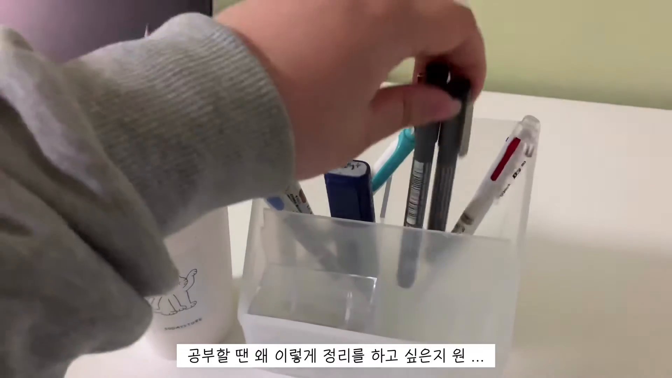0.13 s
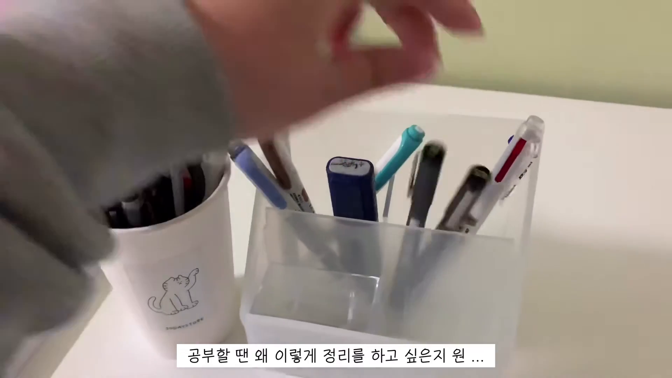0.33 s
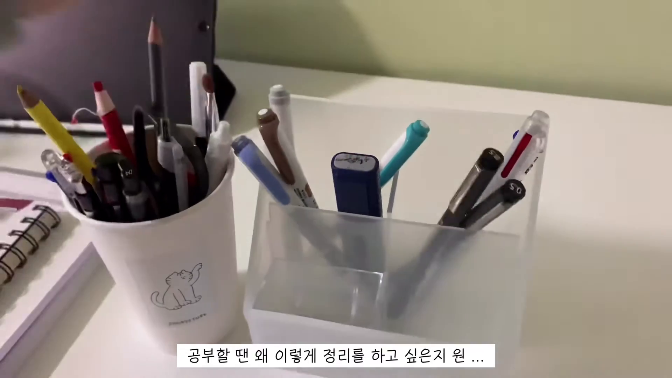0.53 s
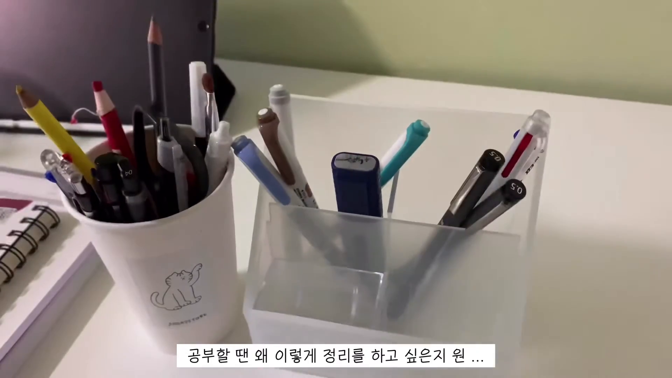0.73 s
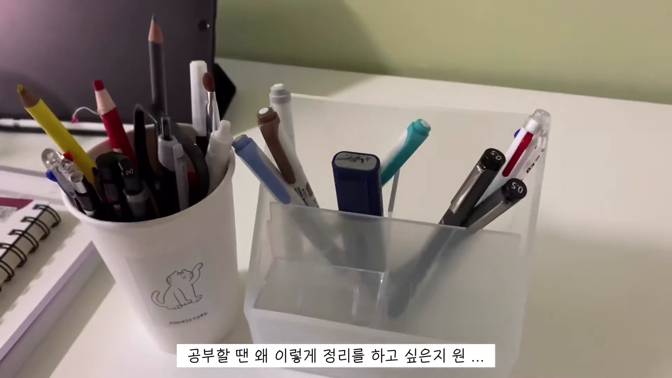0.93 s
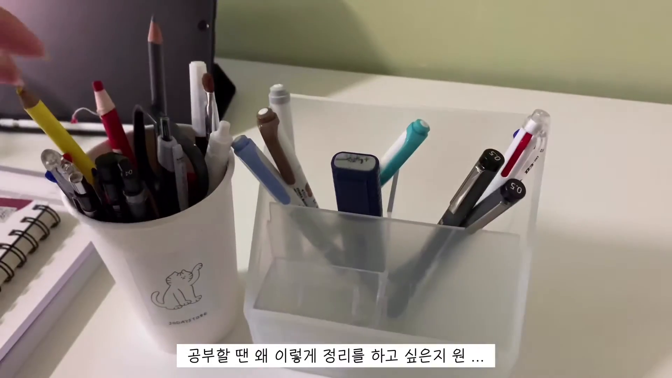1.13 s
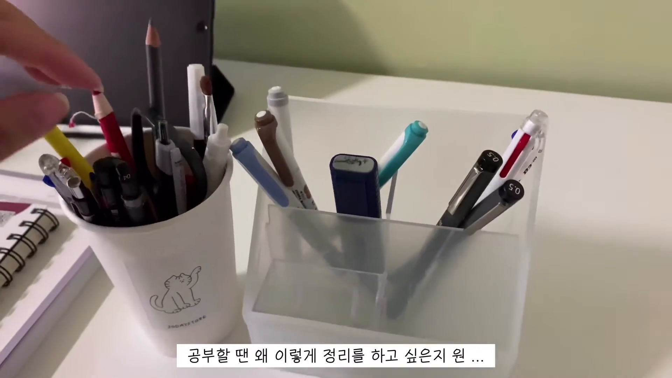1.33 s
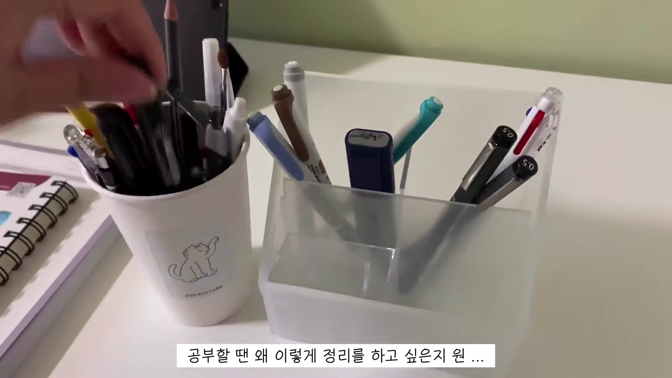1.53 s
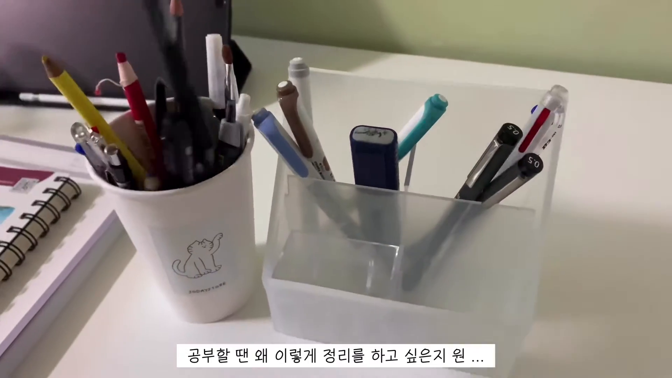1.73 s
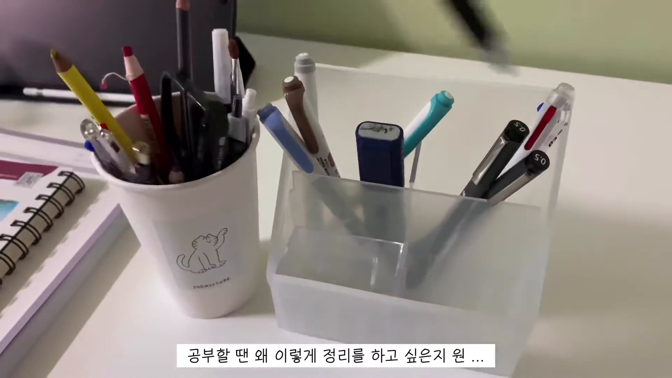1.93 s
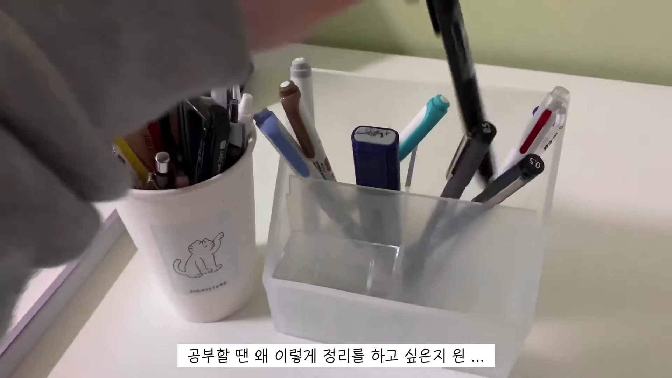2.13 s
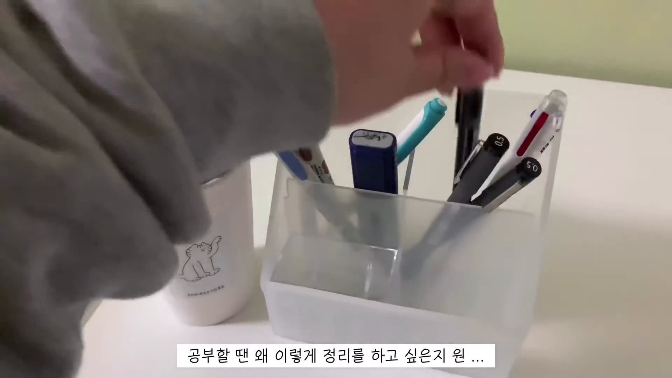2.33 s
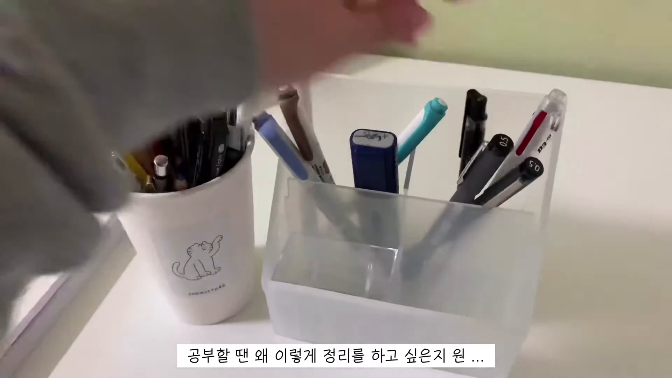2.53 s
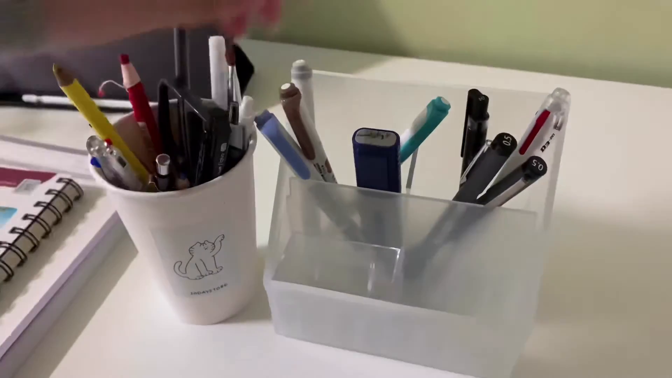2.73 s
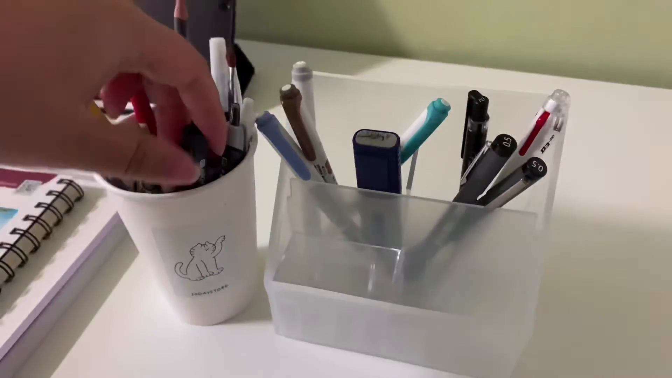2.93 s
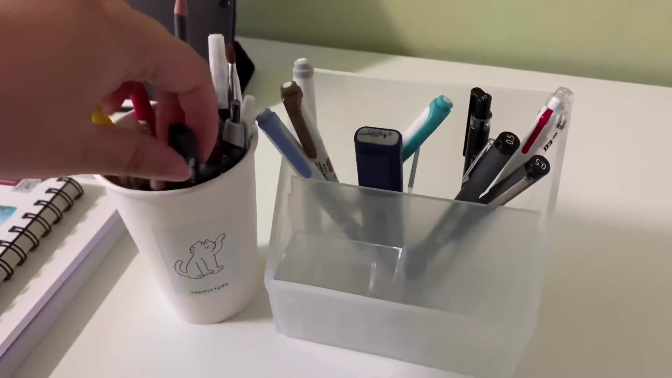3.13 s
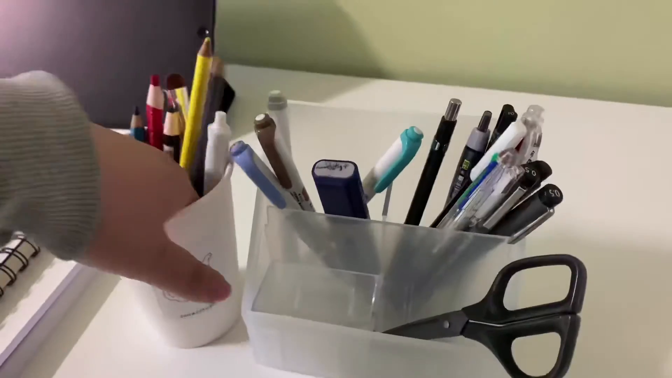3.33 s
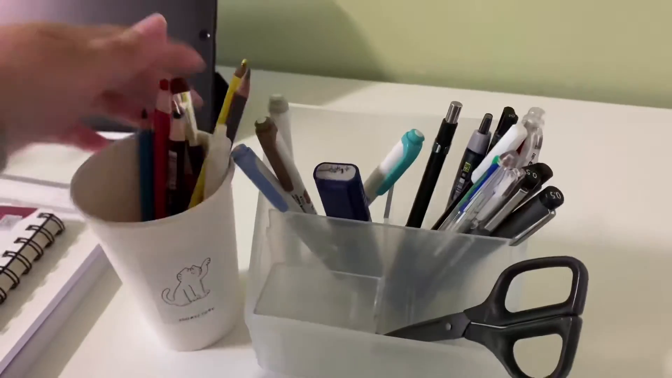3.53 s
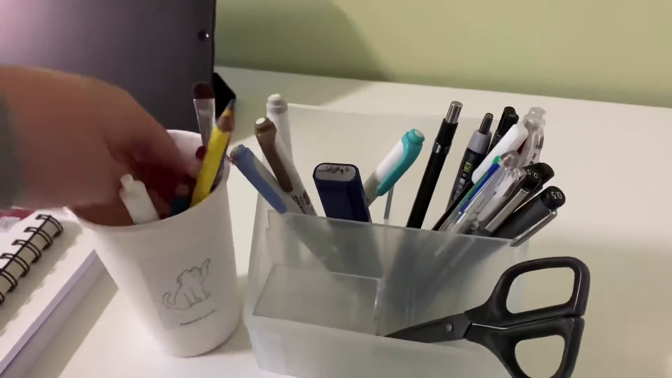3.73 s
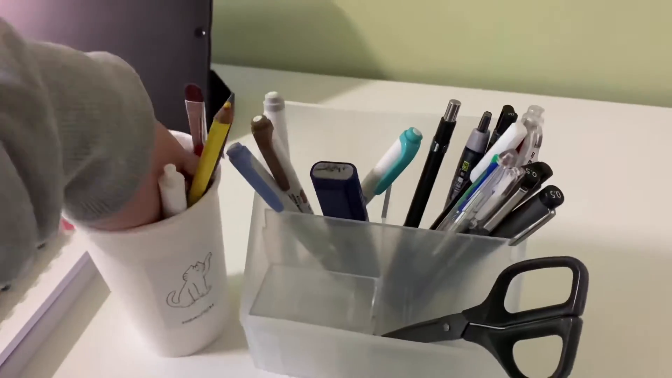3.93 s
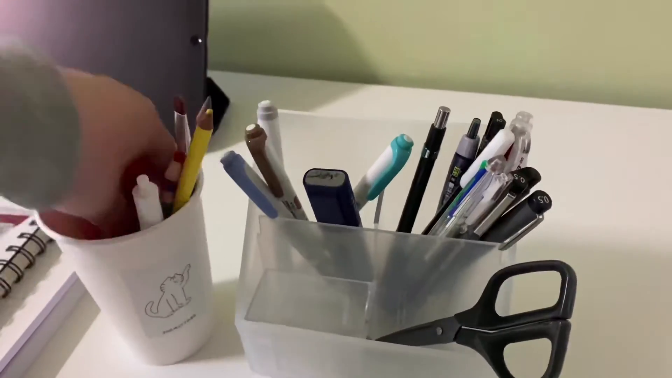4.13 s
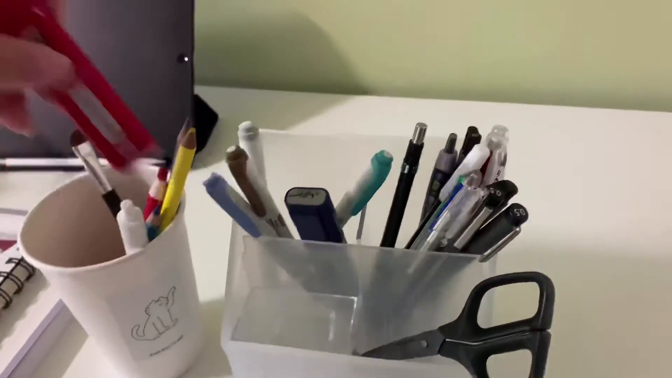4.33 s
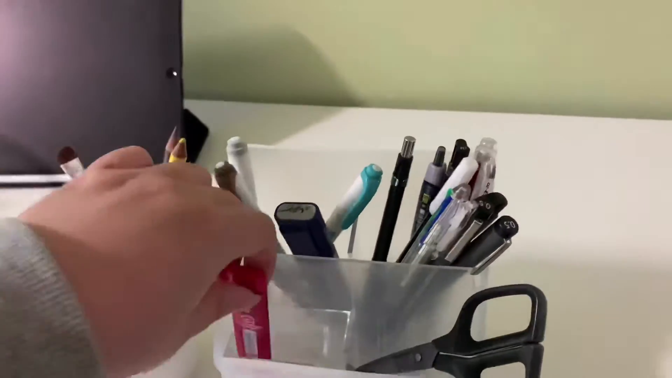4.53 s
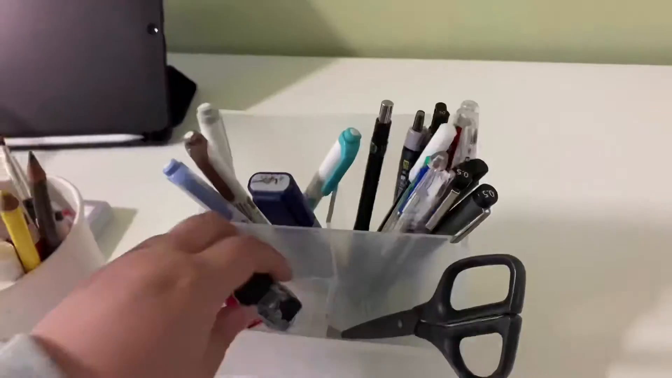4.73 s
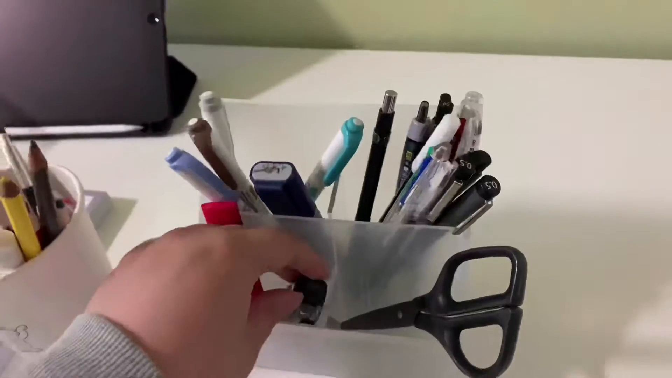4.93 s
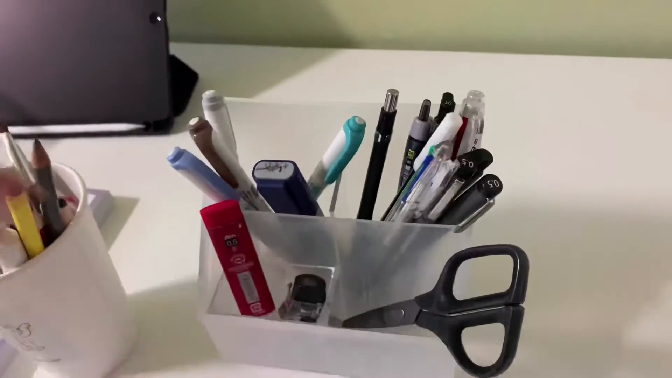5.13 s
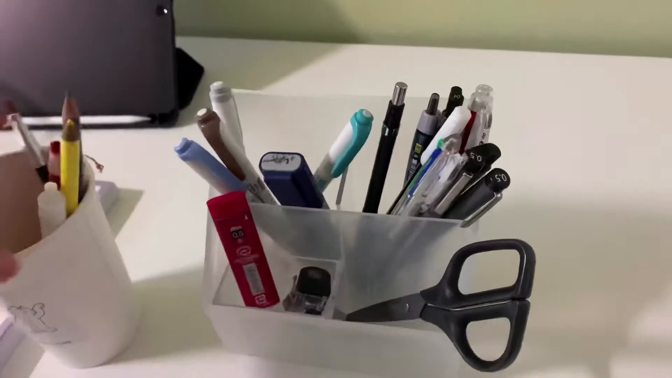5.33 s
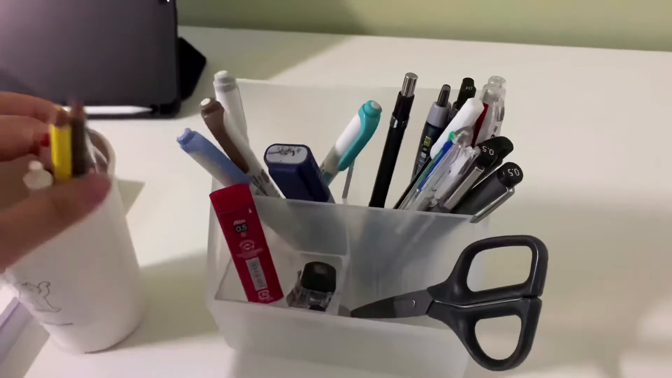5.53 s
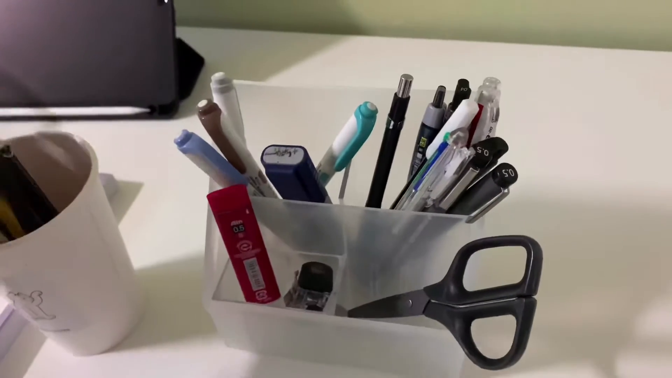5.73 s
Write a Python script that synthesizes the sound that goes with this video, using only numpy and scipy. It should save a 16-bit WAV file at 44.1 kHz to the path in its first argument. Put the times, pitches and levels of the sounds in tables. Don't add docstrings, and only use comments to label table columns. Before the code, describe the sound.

Close stationery sounds: hard pen drops in a plastic organizer, rustling in a paper cup, then higher, faster rattling and small clicks, ending with a sharp knock.

```python
import sys
import numpy as np
from scipy import signal
from scipy.fft import rfft, irfft, next_fast_len
from scipy.io import wavfile
from scipy.ndimage import uniform_filter1d

SR = 44100
rng = np.random.default_rng(int(sys.argv[2]) if len(sys.argv) > 2 else 0)


def generate_wav(sig):
    pcm = np.round(np.clip(np.atleast_2d(sig).T, -1, 1) * 32767).astype(np.int16)
    wavfile.write(sys.argv[1], SR, pcm)


def elevation(decibels):
    levels = np.asarray(decibels, float)
    return 10 ** (levels / 20)


N = 259308
SPEED = 2.725
FAST_FROM_S = 3.21
# frequency in Hz, level in dB, t60 in s.
DESK = [(58.5, -10, 0.14), (113, -5, 0.025), (111, -2, 0.14), (144.7, 1, 0.088), (268, -9, 0.089)]


def evened(x):
    return x / np.sqrt(np.mean(x ** 2) + 1e-20)


def read(points, hz):
    f, value = np.transpose(points)
    return np.interp(np.log(hz + 1), np.log(f + 1), value)


def coloured(x, points):
    hz = abs(np.fft.fftfreq(4096, 1 / SR))
    log_gain = np.maximum(read(points, hz), -100) * np.log(10) / 20
    taps = np.fft.ifft(np.exp(np.conj(signal.hilbert(log_gain)))).real[:2048]
    taps = taps.reshape((1,) * (x.ndim - 1) + (-1,))
    return signal.oaconvolve(x, taps, axes=-1)[..., :x.shape[-1]]


def band(x, lo_hz, hi_hz):
    return signal.sosfilt(signal.butter(2, [lo_hz, hi_hz], "band", fs=SR, output="sos"), x)


def ring(modes, t, chance, detune, uneven_db):
    hz, db, t60_s = np.transpose(modes)[:, :, None]
    level_chance = chance[:len(hz), None]
    pitch_chance = chance[::-1][:len(hz), None]
    decay = elevation(db + uneven_db * level_chance - 60 * t / t60_s)
    swell = 1 - np.exp(-t * hz / 0.68)
    x = (decay * swell * np.sin(2 * np.pi * hz * (1 + detune * pitch_chance) * t)).sum(0)
    return x / abs(x).max()


def air(colour, db, same):
    a, b = rng.standard_normal((2, N))
    return elevation(db) * evened(coloured(np.array([a + same * b, a - same * b]), colour))


def room(x, speed):
    # frequency in Hz, t60 in s.
    decay_times = [(100, 0.35), (500, 0.19), (2000, 0.13), (8000, 0.097), (13000, 0.084)]
    taps = np.zeros((2, SR // 2))
    at = np.arange(400, SR // 2 - 10, 10)
    at = at + rng.integers(0, 10, (2, len(at)))
    np.put_along_axis(taps, at, rng.choice([-1., 1.], at.shape), 1)
    hz, t, z = signal.stft(taps, SR, nperseg=256)
    decay = elevation(-60 * t * speed / read(decay_times, hz / speed)[:, None])
    tail = signal.istft(z * decay, SR, nperseg=256)[1]
    flutter = evened(uniform_filter1d(rng.standard_normal(N), int(150 / speed)))
    x = x + 1.4 * flutter * band(x, 250 * speed, 19845)
    return signal.fftconvolve(x.mean(0)[None], tail / np.linalg.norm(tail[0]), axes=1)[:, :N]


def bumps(rows, desk_speed, rise_s, db, sag_db):
    out, t = np.zeros(N + SR), np.arange(int(.25 * SR)) / SR
    modes = DESK + [(54.3, sag_db, 0.1)]
    for (s, peak_db), chance in zip(rows, rng.standard_normal((len(rows), 8))):
        push = ring(modes, t * desk_speed, chance, 0.014, 3.6) * (1 - np.exp(-t / rise_s))
        out[round(s * SR):][:len(t)] += elevation(db + peak_db) * push / abs(push).max()
    return out[:N]


def rattle(shift, per_s, spread_db):
    # frequency in Hz, level in dB, t60 in s.
    loose_pens = [(560, 3, 0.013), (920, -0.5, 0.027), (1550, -17, 0.055), (2220, -6, 0.068),
                  (3900, -4.5, 0.0047), (4800, -17.5, 0.02)]
    pens = loose_pens * 2
    size = elevation(spread_db * np.minimum(rng.exponential(1, N), 4)) * (rng.random(N) < per_s / SR)
    which, out = rng.integers(0, len(pens), N), np.zeros(N)
    for k, (hz, db, t60_s) in enumerate(pens):
        r = elevation(-60 * shift / (t60_s * SR))
        turn = 2 * np.pi * hz * shift * rng.uniform(1.0, 1.08) / SR
        resonator = [1, -2 * r * np.cos(turn), r * r]
        out += elevation(db) * signal.lfilter([np.sin(turn)], resonator, size * (which == k))
    return evened(out)


def hands(strokes, colour, speed, desk_speed, rumble_db, split_hz, per_s, spread_db, smooth, pens):
    grip_s = 0.01
    t, level = np.arange(N) / SR, np.zeros((3, N))
    for start, end, from_db, to_db, dry_db in strokes:
        span = slice(round((start - grip_s) * SR), round((end + grip_s) * SR))
        edge_s = np.minimum(t[span] - start, end - t[span])
        grip = np.clip(edge_s * speed / grip_s + .5, 0, 1)
        effort = elevation(np.interp(t[span], [start, end], [from_db, to_db]))
        level[:, span] += grip * effort * elevation(np.array([[0], [rumble_db], [dry_db]]))
    size = elevation(spread_db * np.minimum(rng.exponential(1, N), 4)) * (rng.random(N) < per_s / SR)
    slips = signal.lfilter([1], [1, -np.exp(-speed / (.004 * SR))], size)
    rub = coloured((smooth + evened(slips)) * rng.standard_normal(N), colour)
    catch = uniform_filter1d(uniform_filter1d(rng.standard_normal(N), size=500), size=500)
    rub *= elevation(2.7 * evened(catch))
    scratch = signal.sosfilt(signal.butter(4, split_hz, "high", fs=SR, output="sos"), rub)
    rustle = signal.sosfilt(signal.butter(4, split_hz, "low", fs=SR, output="sos"), rub)
    desk = ring(DESK, np.arange(6000) / SR * desk_speed, np.zeros(8), 0, 0)
    rumble = signal.oaconvolve(rng.standard_normal(N), desk)[:N]
    return level[0] * (evened(rustle) + pens) + level[1] * evened(rumble) + level[2] * evened(scratch)


def slides(sharp, grain_s):
    # start in s, end in s, level in dB, pitch at start in Hz, pitch at end in Hz.
    slide_rows = [
        (1.512, 1.535, -50, 3900, 3970),
        (1.768, 1.89, -65, 3600, 3900),
        (3.878, 4.224, -59, 1310, 1360),
        (5.278, 5.302, -34.5, 2220, 2050),
        (3.035, 3.117, -73, 3900, 3900),
        (5.413, 5.548, -60, 2540, 2600),
    ]
    out = np.zeros(N)
    for start, end, db, from_hz, to_hz in slide_rows:
        a, b, c = rng.standard_normal((3, SR // 2))[:, :round((end - start) * SR)]
        r, hz = np.exp(-np.pi * from_hz / sharp / SR), np.linspace(from_hz, to_hz, len(a))
        narrow = signal.lfilter([1 - r], [1, -r], a + 1j * b)
        narrow = signal.lfilter([1 - r], [1, -r], narrow)
        note = narrow * np.exp(2j * np.pi * np.cumsum(hz) / SR)
        uneven = elevation(3.9 * evened(uniform_filter1d(c, max(round(grain_s * SR), 1))))
        fade = signal.windows.tukey(len(a), .3)
        out[round(start * SR):][:len(a)] += elevation(db) * evened(note.real * uneven) * fade
    return out


def knocks(rows, desk_db, chatter_ms, speed, box_db, pen_db, pen_cycles, tick_lo_hz, tick_hi_hz):
    # frequency in Hz, level in dB, t60 in s.
    box_modes = [(389, -4, .05), (466, -9, .03), (523, 4.5, .036), (654, -4, .04), (750, -8, .04),
                 (871, -1, .035), (1040, -8, .018), (1141, -3, .016), (1240, -6, .016), (1712, -3, .022),
                 (1858, -6, .035), (2300, -5, .018), (3400, -15, .012), (5280, -13, .013)]
    lead = 700
    thump_slope = 0.39
    out, t = np.zeros((2, N + SR)), np.arange(int(.2 * SR / speed)) / SR
    chances, u = rng.standard_normal((len(rows), 2, 2048)), t[:2048]
    since_ms = 1000 * (u - u[lead])
    after = np.exp(-abs(since_ms) / chatter_ms)
    before = elevation(-12.0) * np.exp(-abs(since_ms) / min(0.3 * chatter_ms, 3))
    for (s, db, pen_hz, tick_db, share_db), (chance, grit) in zip(rows, chances):
        contacts = np.where(since_ms > -.7, after, before) * grit * abs(chance)
        contacts[lead] += elevation(16.0)
        z = rfft(contacts, 4096)
        contacts = irfft(z / abs(z) ** 0.5)[:2048] * np.exp(-abs(since_ms) / 6.1)
        thin_db = 2.0 * np.log2(pen_hz / (900 * speed)).clip(0, 3)
        body = elevation(box_db + share_db - thin_db) * ring(box_modes, t * speed, chance[:20], .012, 2.5)
        pen = [(pen_hz, 0, pen_cycles / pen_hz)]
        body += elevation(pen_db + thin_db / 2) * ring(pen, t, chance[20:40], 0.0037, 1)
        crack = band(grit[::-1] * elevation(-60 * u * speed / 0.011), 600 * speed, 5000 * speed)
        body[:2048] += elevation(-1.0 + 0.61 * tick_db + 0.2 * share_db) * crack
        x = signal.fftconvolve(body, contacts)[:len(t)]
        x *= abs(body).max() / abs(x).max()
        thump = ring(DESK, t * speed, chance[40:60], 0.011, 4) * (1 - np.exp(-t * speed / 0.0014))
        x[lead:] += elevation(desk_db - thump_slope * db) * thump[:-lead]
        tick = band(contacts, tick_lo_hz, tick_hi_hz)
        x[:2048] += elevation(tick_db) * tick / abs(tick).max()
        at = round((s + .001 / speed) * SR) - lead
        pan_db = np.array([[1], [-1]]) * (-0.5 + .5 * chance[60])
        out[:, at:at + len(t)] += elevation(db + pan_db) * x
    return out[:, :N]


def natural_part():
    # frequency in Hz, level in dB per Hz.
    air_colour = [(15, -44.5), (25, -14), (124, -1), (266, -22), (358, -19), (902, -31), (4600, -38.5),
                  (7300, -42.5), (9580, -32), (11600, -48.5), (14000, -38), (16500, -60)]
    # time in s, peak in dB.
    bump_rows = [(0.106, -38), (0.239, -23), (0.289, -25.5), (0.448, -68), (1.447, -30.5), (1.498, -35),
                 (1.549, -32), (1.771, -44), (1.829, -41), (1.989, -30.5), (2.133, -26), (2.383, -15),
                 (2.795, -43.5), (2.825, -46.5), (2.856, -45.5), (2.89, -42.5), (1.6, -34.5), (1.68, -40.5),
                 (2.2, -38), (3.07, -46)]
    # start in s, end in s, effort at start in dB, at end in dB, dryness in dB.
    stroke_rows = [(0.11, 0.225, -64.5, -57, -40.5), (0.228, 0.247, -44, -23.5, -7),
                   (0.25, 0.35, -58, -46.5, -26), (0.35, 0.55, -49.5, -62, -17),
                   (1.1, 1.3, -80.5, -79.5, -3), (1.45, 1.56, -46, -42.5, -9), (1.56, 1.76, -58, -65, -7),
                   (1.77, 1.89, -68.5, -66, 3), (1.9, 1.99, -50.5, -52, -4),
                   (1.99, 2.07, -53.5, -54.5, -2.5), (2.07, 2.3, -46.5, -60.5, -14),
                   (2.32, 2.39, -51, -32, -8), (2.39, 2.6, -45.5, -73.5, -18), (2.79, 2.86, -60, -56.5, 1),
                   (2.86, 3.0, -49.5, -85, -3), (3.03, 3.13, -59, -64, -15.5), (3.155, 3.22, -58.5, -65, 0)]
    # frequency in Hz, level in dB per Hz.
    rub_colour = [(180, -28.5), (300, 13.5), (1000, 1), (1240, -27.5), (1590, -5.5), (2990, -17),
                  (3550, -11.5), (5810, -15.5), (10300, -43.5), (12000, -48.5), (15600, -80), (22000, -120)]
    # time in s, peak in dB, pen ring in Hz, tick in dB re peak,
    # box share in dB.
    nudge_rows = [(1.133, -48.5, 5650, 1.5, -5), (1.225, -39.5, 2266, -10.5, -6), (1.45, -55, 692, -11, 6),
                  (1.467, -36, 5120, -4, 3.5), (1.475, -24.5, 3900, -3, -27), (1.479, -21, 960, -15, -0.5),
                  (1.504, -19.5, 2310, -12, -21), (1.508, -23.5, 5060, -9, 0),
                  (1.513, -22.5, 1510, 1.5, -1), (1.524, -41, 5300, 12.5, -6), (1.549, -28, 864, -18, -21),
                  (1.595, -31.5, 4860, -8, 8), (1.618, -20.5, 614, -14, -2.5),
                  (1.681, -45.5, 3960, -5.5, 5.5), (1.727, -37.5, 1580, -13.5, -6.5),
                  (1.778, -45, 3800, -14, -26), (1.822, -37.5, 3406, -11, -10.5),
                  (1.913, -34.5, 870, -36, 4.5), (1.929, -35.5, 1474, -8.5, -4),
                  (2.788, -34, 2446, -14, -22), (2.789, -35, 5280, -14.5, -1.5),
                  (2.856, -40, 1670, -15, -10), (2.861, -41.5, 986, -6.5, -7), (2.889, -38, 3930, -11, -5),
                  (3.167, -51.5, 880, 2, 2), (1.786, -51, 4080, -7.5, -25), (1.906, -43.5, 4900, -19, -5),
                  (1.956, -33.5, 3960, -16, -12.5), (1.94, -38, 1500, -12, -6),
                  (2.396, -15.5, 9500, 2.5, -16)]
    # time in s, peak in dB, pen ring in Hz,
    # tick in dB re peak, box share in dB.
    drop_rows = [(0.111, -30.5, 805, -24.5, -4), (0.19, -30.5, 975, -35, 2.5), (0.237, -21, 2300, -10, -2),
                 (0.245, -4.5, 1007, -1.5, 5.5), (0.245, -5, 2270, -26, -21),
                 (0.253, -14.5, 2680, -19, 0.5), (0.264, -10, 2550, -16, 1.5), (0.27, -20.5, 2100, -15, -2),
                 (0.287, -4, 1035, -6, 1.5), (0.287, -4, 1880, -4, -20), (0.304, -13, 2060, -9, 2.5),
                 (0.332, -17.5, 820, -11, -0.5), (0.35, -19, 2420, 3.5, -9.5),
                 (0.356, -6.5, 1173, -15, -4.5), (0.377, -24.5, 1173, -18, 0),
                 (0.453, -21.5, 2415, -8.5, 1.5), (0.461, -27, 1735, 2.5, 4), (0.473, -18, 1052, -25, -12),
                 (1.986, -32.5, 2700, -18, -12.5), (1.991, -2, 1787, -13, -0.5),
                 (1.992, -7.5, 1114, -36, -29.5), (2.0, -27.5, 2570, -22, 1.5),
                 (2.049, -22.5, 2430, -20, -9), (2.051, -21.5, 960, -27, -9), (2.086, -41, 899, -26, 5.5),
                 (2.116, -24.5, 2400, -17, -12.5), (2.119, -31, 1164, -5.5, 9),
                 (2.137, -22.5, 2000, -23, 4.5), (2.174, -31, 1236, -10, -3.5), (2.189, -31, 2400, -26, -5),
                 (2.277, -43.5, 990, -45, -0.5), (2.331, -6.5, 2265, -13, 1.5), (2.385, -34, 2418, 1, -8.5),
                 (2.388, -2, 2470, -11, 5.5), (2.388, -11.5, 5250, -6, -20), (2.397, -19.5, 12500, 4.5, 3),
                 (2.505, -36, 708, -32, -6), (2.519, -52.5, 2406, -22, 18.5),
                 (0.287, -11, 6606, -12.5, -25), (1.992, -11, 5760, -10, -11.5)]
    x = sum(knocks(rows, desk_db, chatter_ms, 1.0, -1.6, -6.0, 21, 1700, 13000)
            for rows, desk_db, chatter_ms in [(drop_rows, -24, 4.8), (nudge_rows, -33, 12)])
    pens = elevation(-4.0) * rattle(0.89, 180, 6.1)
    x += hands(stroke_rows, rub_colour, 0.87, 1, 1.4, 1700, 350, 3, 1.0, pens)
    x += bumps(bump_rows, 1.08, 0.039, 0.9, 1.0) + slides(7.2, 0.0065)
    x = band(x + elevation(-15.5) * room(x, 0.89), 68.0, 9000)
    return x + air(air_colour, -68, 0.18)


def fast_part():
    # frequency in Hz, level in dB per Hz.
    air_colour = [(24, -71), (90, -20.5), (200, -10.5), (308, -4), (400, -22), (510, -25), (690, -27),
                  (1140, -35), (1290, -39.5), (9720, -43.5), (11900, -52), (16500, -49)]
    # time in s, peak in dB.
    bump_rows = [(3.231, -46.5), (3.315, -41.5), (3.534, -40), (3.617, -27), (3.748, -32), (4.167, -46),
                 (5.238, -31), (5.279, -30.5), (5.413, -41), (5.546, -31.5), (5.654, -37.5), (5.851, -26)]
    # time in s, peak in dB.
    set_down_rows = [
        (4.119, -48.5),
        (4.367, -31),
        (4.562, -33),
        (4.653, -28),
        (4.888, -36.5),
        (5.161, -51.5),
    ]
    # start in s, end in s, effort at start in dB, at end in dB, dryness in dB.
    stroke_rows = [(3.21, 3.41, -59, -73, 8), (3.523, 3.665, -51, -42.5, -10), (3.68, 3.83, -56, -55, 3.5),
                   (3.83, 4.23, -61.5, -66, 6.5), (4.37, 4.45, -47.5, -84, 3.5),
                   (4.55, 4.7, -65, -71, -17.5), (4.84, 4.88, -62.5, -70, -4),
                   (4.94, 5.05, -92.5, -100, -14), (5.224, 5.34, -42, -63.5, -3),
                   (5.38, 5.56, -61.5, -56, 5), (5.56, 5.78, -53.5, -59, -12), (5.78, 5.9, -53.5, -46.5, 4)]
    # frequency in Hz, level in dB per Hz.
    rub_colour = [(400, -85), (600, -6.5), (1100, -3.5), (1350, -10), (1700, -5), (2200, -7), (6800, -20.5),
                  (7000, -72), (8000, -77), (8300, -16), (12700, -20), (15800, -20.5), (16500, -20)]
    # time in s, peak in dB, pen ring in Hz, tick in dB re peak,
    # box share in dB.
    nudge_rows = [(3.222, -33, 935, -36, 2), (3.233, -33, 1420, 1, -5), (3.259, -37.5, 1180, -12, 10),
                  (3.248, -35.5, 5300, -5, 11), (3.292, -48, 7100, -1, -7), (3.277, -37, 7200, -16, -13),
                  (3.313, -37, 1180, 12.5, 15.5), (3.339, -33.5, 1150, 2, 10), (3.373, -41, 1054, -2, 1),
                  (3.53, -33, 960, -11.5, -3.5), (3.552, -34.5, 1100, -2, 8), (3.577, -31, 2580, 2, -4),
                  (3.593, -34, 1400, 1, 13), (3.602, -22.5, 1590, -6, -8), (3.617, -20.5, 2360, -35, 8),
                  (3.637, -26, 2400, 3.5, -4), (3.643, -27.5, 1480, 5, -1), (3.688, -30, 1550, 5.5, -3),
                  (3.702, -28.5, 2230, -27, -11), (3.717, -38, 2570, -10, 12),
                  (3.744, -31.5, 1420, -4, 6.5), (3.764, -38, 1270, -7, 16.5), (3.796, -35, 1180, -10, 6.5),
                  (3.813, -61, 2970, -2, -6), (3.85, -53, 1290, -16, 7), (3.963, -43, 1290, -20, -2),
                  (4.014, -42, 2200, 3, 3), (4.038, -41, 1320, -28, 8), (4.067, -40, 1450, -30, 10),
                  (4.114, -46.5, 1460, -14, 20), (4.128, -38, 2130, -4, 3), (4.169, -37, 954, -40, 7),
                  (4.21, -37.5, 1360, -36, -16), (3.883, -48, 2610, -14, -3), (3.948, -47.5, 5700, 3, -14),
                  (4.003, -57, 1180, -15, 22), (3.9, -51, 1300, -15, 3), (4.19, -41, 1140, -24, 11)]
    # time in s, peak in dB, pen ring in Hz, tick in dB re peak,
    # box share in dB.
    drop_rows = [(4.304, -64, 5780, 15.5, 8), (4.371, -37, 1305, -5.5, 5.5), (4.457, -48.5, 4070, -9, 2.5),
                 (4.523, -21.5, 4800, -10, -25), (4.53, -34, 3900, -13.5, -15), (4.559, -20, 3030, -36, 5),
                 (4.56, -26, 5700, -22, -23), (4.592, -19, 2520, -14.5, -3), (4.593, -25, 1160, -30, -17),
                 (4.615, -38, 2670, -14, 8), (4.625, -31, 1380, 8.5, -23), (4.631, -28.5, 2500, -8, 3),
                 (4.647, -30.5, 6600, 4, -18), (4.649, -30, 736, -34, 13), (4.661, -32, 2600, -14, 4),
                 (4.718, -35, 2740, -12.5, -11), (4.792, -28, 2050, 4, -4.5), (4.888, -47, 980, -38, 16),
                 (4.909, -36, 2760, -7, -1.5), (4.944, -40, 2560, -18, 0), (4.952, -35.5, 1770, -7, 14),
                 (4.976, -36, 2640, -31, 4.5), (4.991, -65, 1884, -21.5, -9), (5.029, -55, 1380, -28, 19.5),
                 (4.75, -54.5, 2000, -9, 4), (4.77, -54.5, 3000, -6, -6)]
    # time in s, peak in dB, pen ring in Hz,
    # tick in dB re peak, box share in dB.
    shift_rows = [(5.226, -29, 817, -21.5, 2.5), (5.234, -16.5, 2640, -13.5, -2.5),
                  (5.276, -21, 2200, -11, 4), (5.28, -20.5, 1530, -3, 10), (5.41, -36, 2000, -0.5, -12),
                  (5.456, -40.5, 2700, -20, -1.5), (5.518, -39.5, 2660, 6, -15),
                  (5.547, -24.5, 1500, -22, 9), (5.579, -27.5, 1360, -30, 1), (5.602, -25, 9600, -40, -23),
                  (5.651, -29, 1670, 2.5, 12), (5.666, -37.5, 1530, -2, 18.5), (5.688, -36, 9600, -24, 7),
                  (5.725, -39.5, 1530, -15, 14.5), (5.74, -29.5, 1470, -10, 3),
                  (5.777, -25.5, 1170, -14, 5), (5.797, -25, 8600, -13, 0), (5.805, -21, 9300, -23, -10),
                  (5.806, -20.5, 4100, -20, 7), (5.851, -9, 4350, -11, -2.5), (5.591, -41, 5500, -5, -8),
                  (5.627, -43, 9100, -5, -10), (5.445, -46, 5800, -12, 5)]
    kinds = [(nudge_rows, -18, 12), (drop_rows, -30, 4.1), (shift_rows, -18.5, 10)]
    x = sum(knocks(rows, desk_db, chatter_ms, SPEED, -8.0, -1.4, 11.5, 1330, 19845)
            for rows, desk_db, chatter_ms in kinds)
    pens = elevation(-2.0) * rattle(SPEED, 540, 1.6)
    x += hands(stroke_rows, rub_colour, SPEED, SPEED, -3.7, 4430, 520, 4.4, 0.96, pens)
    x += bumps(bump_rows, 1.35, 0.0026, 2.7, -51.0)
    x += bumps(set_down_rows, SPEED * 1.083, 0.0015, 0.56, -10.5)
    x += slides(11.0, 0.0048)
    x = band(band(x + elevation(-16.0) * room(x, SPEED), 95, 19000), 120, 19500)
    return x + air(air_colour, -64.5, 0.094)


def scene():
    # start in s, end in s.
    gaps = [
        (0, .1107),
        (1.408, 1.4505),
    ]
    t = np.arange(N) / SR
    out = np.where(t < FAST_FROM_S, natural_part(), fast_part())
    for start, end in gaps:
        out *= np.where((t > start) & (t < end), elevation(-54.5), 1)
    return out


def band_limit(x):
    return signal.sosfilt(signal.butter(12, 16670, fs=SR, output="sos"), x)


def record(dry):
    # frequency in Hz, level in dB.
    port_gap = [(60, -22.5), (110, -24), (200, -12), (380, -8), (1290, -8.5), (2380, -1), (4400, 1.5),
                (15000, -1.5)]
    fast_port_gap = [(60, -6), (110, -19), (380, -18), (700, -7.5), (1290, -4), (2380, -5), (4400, -1.5),
                     (15000, 0.5)]
    # frequency in Hz, phase in radians.
    port_turn = [(60, 1.6), (200, 2.0), (380, 0.9), (700, 2.1), (1290, 0.8), (2380, 0.94), (4400, 1.3),
                 (15000, 1.9)]
    fast_port_turn = [(200, 2), (700, 1.36), (1290, 1.42), (2380, 1.33), (4400, 1.5), (15000, 1.6)]
    mid = dry.mean(0)
    fast = np.arange(N) / SR > FAST_FROM_S
    lean = dry[0] - mid + 0.046 * mid
    side = np.where(fast, band(lean, 760, 10700), band(lean, 250, 15000))
    size = next_fast_len(N + 4096)
    z, hz = rfft(mid, size), np.arange(size // 2 + 1) * SR / size

    def port_side(gap, turn):
        return irfft(z * elevation(read(gap, hz)) * np.exp(1j * read(turn, hz)), size)[:N]

    side += np.where(fast, port_side(fast_port_gap, fast_port_turn), port_side(port_gap, port_turn))
    both = 1.275 * np.tanh((mid + np.array([side, -side])) / 1.722)
    both = signal.oaconvolve(both, signal.firwin(255, 16100, fs=SR)[None], "same")
    return band_limit(both)


dry = scene()
out = record(dry)
generate_wav(out)
```